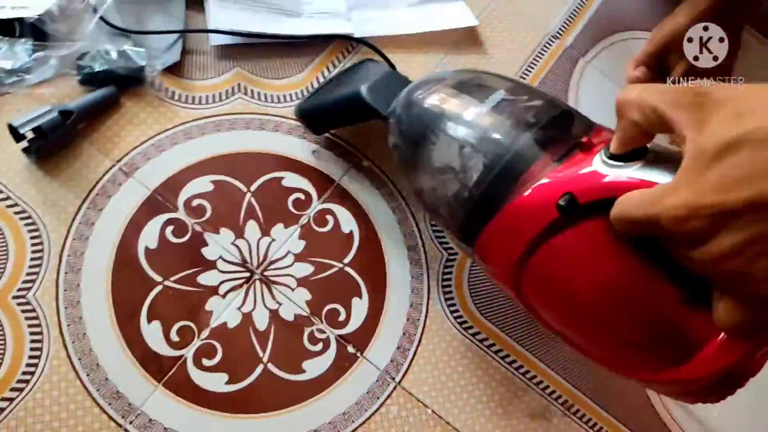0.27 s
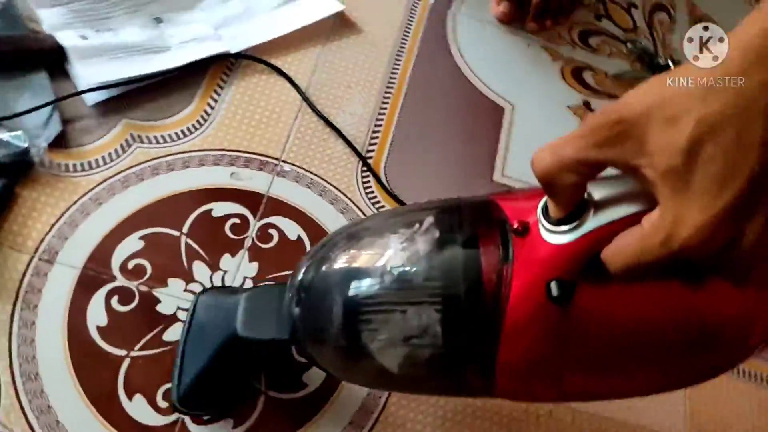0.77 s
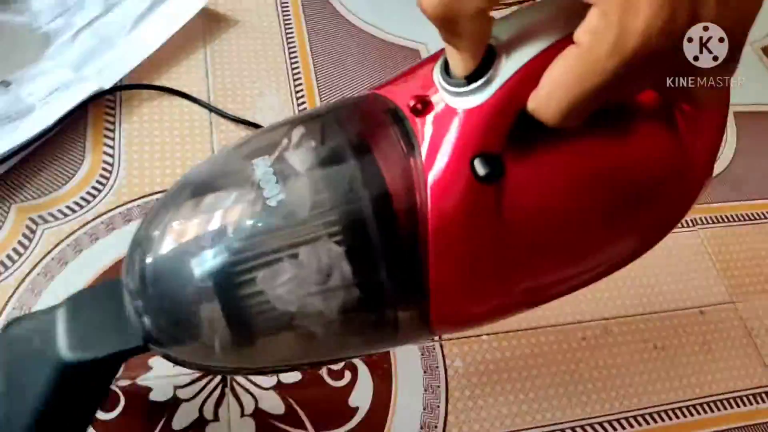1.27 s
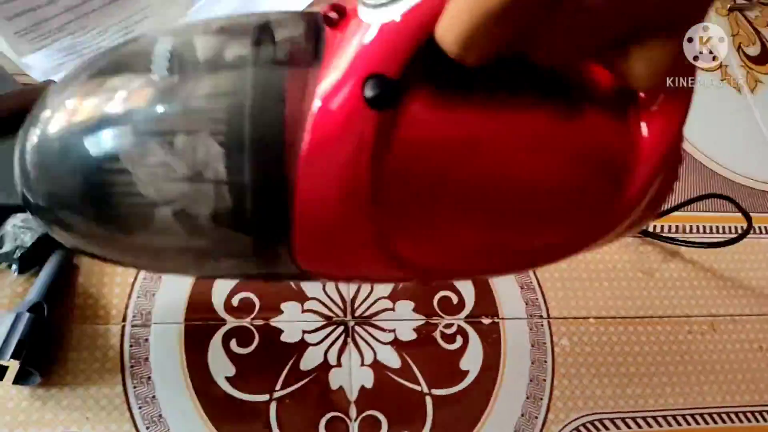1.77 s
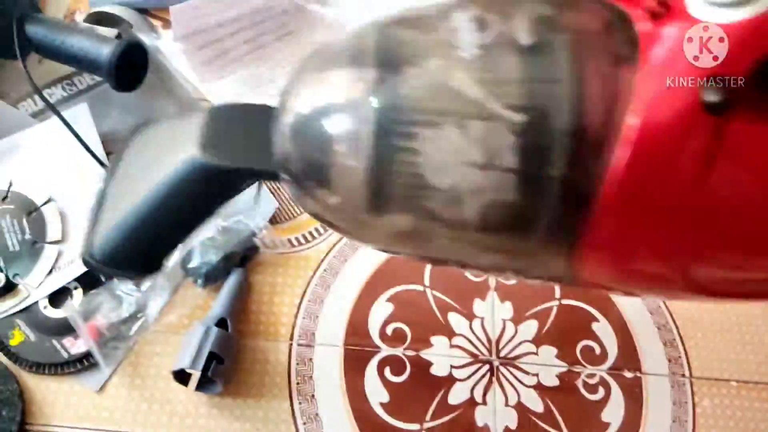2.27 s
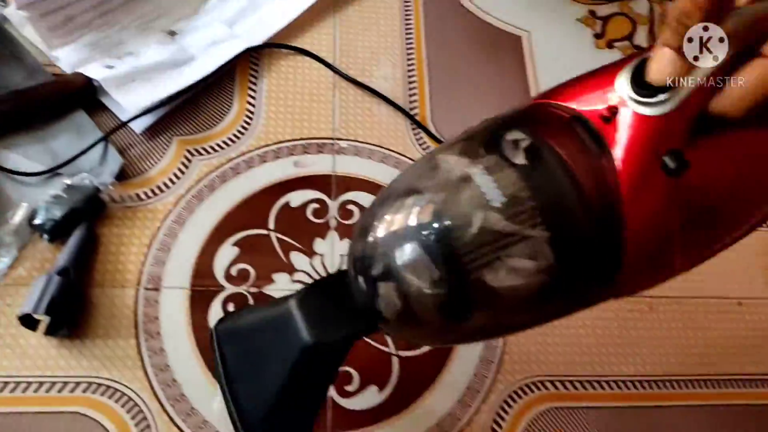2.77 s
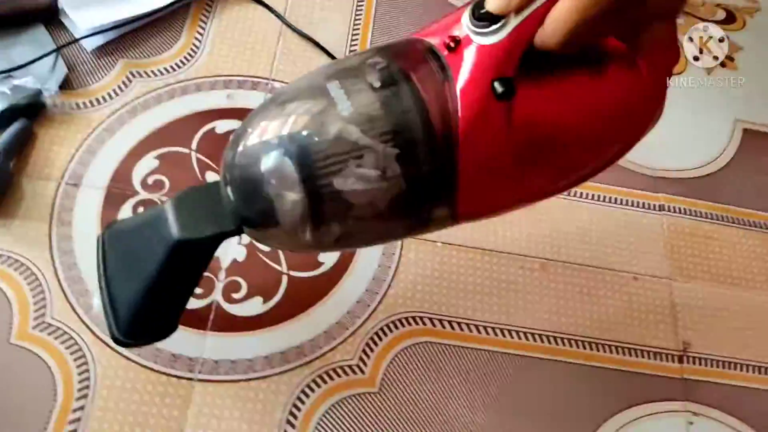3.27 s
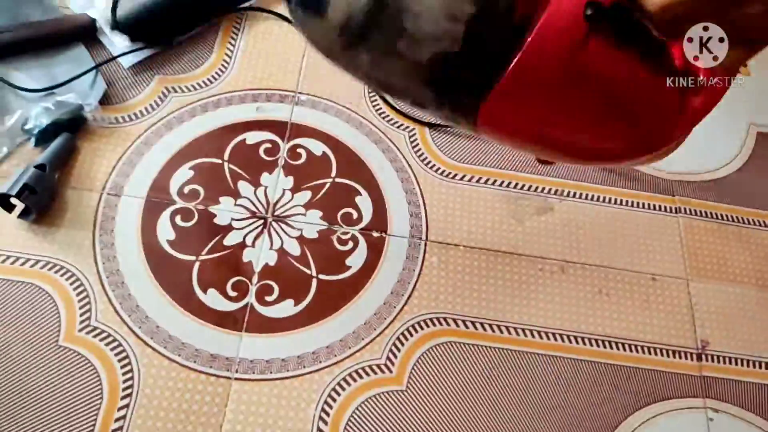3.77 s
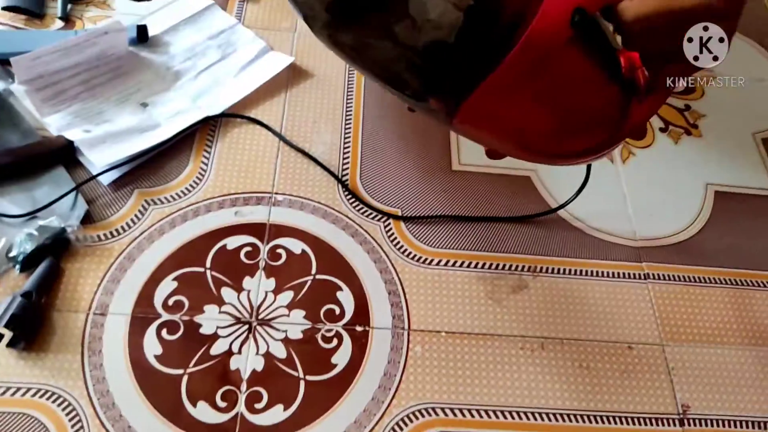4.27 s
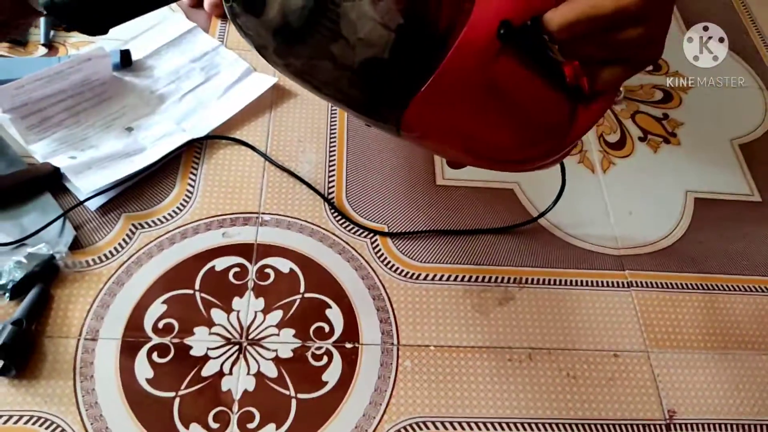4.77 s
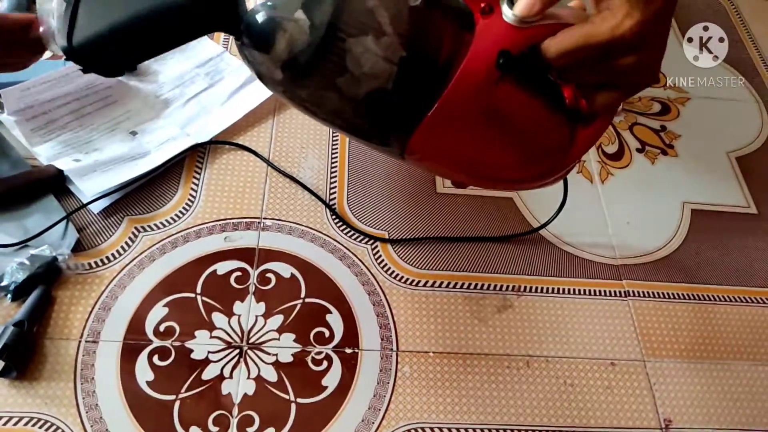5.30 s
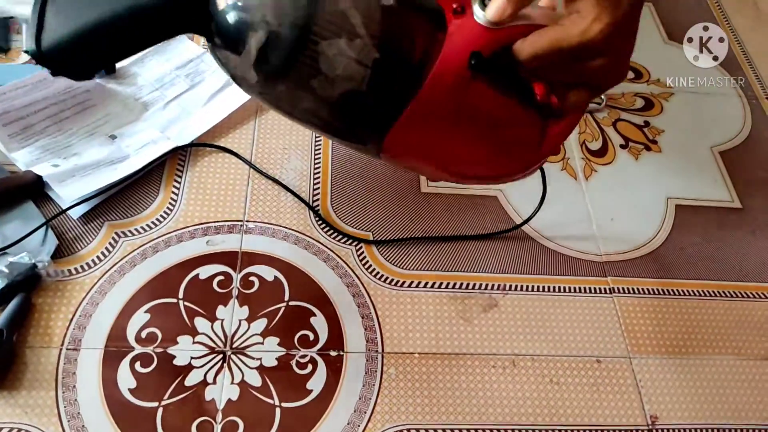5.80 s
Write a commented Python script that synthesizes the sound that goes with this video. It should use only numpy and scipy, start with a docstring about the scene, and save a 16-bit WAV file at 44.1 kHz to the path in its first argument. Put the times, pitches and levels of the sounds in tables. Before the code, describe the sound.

A small vacuum cleaner roars and whines close by, rises in pitch after a slap over its nozzle, then coasts down to a switch click.

```python
"""In a tiled room, a small corded vacuum cleaner is waved about near a two-microphone phone.
Filtered noise makes the rushing air; sines locked to the shaft make the whine.
A palm slaps over the nozzle, so the unloaded fan speeds up; power is cut and the rotor coasts down.
At the end the plastic switch clicks, and its tail of broad noise sinks away in the room.
Knocks and clicks are sums of fading sines and noise; a low rumble of noise lies beneath."""
import sys
import numpy as np
from scipy import signal
from scipy.fft import rfft, irfft, next_fast_len
from scipy.io import wavfile
from scipy.ndimage import uniform_filter1d, map_coordinates

SR = 44100
rng = np.random.default_rng(int(sys.argv[2]) if len(sys.argv) > 2 else 0)


def magnitude_from_level(level_db):
    """Linear magnitude for a level in decibels (20 dB per decade)."""
    exponent = np.asarray(level_db, float) / 20
    return 10 ** exponent


def bounce(signal):
    """Save signal as a 16-bit WAV file at the path given by the first command-line argument."""
    frames = np.transpose(np.atleast_2d(signal))
    limited = np.clip(frames, -1, 1)
    pcm = np.round(limited * 32767).astype(np.int16)
    wavfile.write(sys.argv[1], SR, pcm)


N = 266408  # length of the scene [samples]

SEALED_S, SEALING_S = 2.2, 0.17  # the palm starts to close the nozzle [s], and takes this long [s]

# Rotor under power: settled speed, shortfall at the start [turns/s] and its time constant [s]
RUN_RPS, LAG_RPS, LAG_S = 467, 7.5, 0.28
# Slow creep until the nozzle is sealed [turns/s per s]; then gain [turns/s] and its time constant [s]
CREEP_RPS, UNLOAD_RPS, UNLOAD_S = 0.9, 62.6, 0.537
# Power is cut [s]; a quick first sag [share, s], then drag [per s] towards a slow spin [turns/s]
CUT_S, SAG, SAG_S, DRAG_PER_S, SLOW_RPS = 2.79, 0.018, 0.101, 0.472, 35
FULL_RPS = 500  # speed at which the levels are given [turns/s]

# Colours of the air, each for open nozzle, sealed and fast, sealed and slow:
# (frequency [Hz], relative level [dB per Hz])
ROAR_SPECTRA = ([(15, -70), (25, -58), (43, -38), (113, -16), (134, -6.5), (154, -1.5), (222, -4.5),
                 (315, -0.5), (419, -1.5), (460, 0), (548, -1.5), (1100, -1), (1430, -54), (2420, -120)],
                 [(15, -57), (25, -42), (60, -20), (118, -7.5), (150, 1.5), (222, -3.5), (346, -6.5),
                 (439, 3.5), (566, -6), (673, 2), (740, -1), (1100, -3.5), (1430, -35), (2420, -120)],
                 [(15, -40), (25, -31), (65, -30), (107, -10), (124, -11.5), (175, -3.5), (222, -7),
                 (393, -5.5), (439, 3), (593, -9.5), (652, -2.5), (1100, -17), (1430, -47), (2420, -120)])
CUP_SPECTRA = ([(590, -57), (1000, -42), (1080, -3), (1590, -4.5), (1920, -8), (2040, -3), (2210, -6.5),
                (2560, 2.5), (2720, -1), (3070, -9), (3360, -19), (3440, -7), (3900, -18), (5070, -13),
                (8580, -120)], [(590, -34), (1000, -11), (1390, -5), (1640, -1), (1690, 2.5), (1900, 0),
                (2000, -0.5), (2090, -5.5), (2310, -4.5), (2790, -11.5), (3100, -11.5), (4030, -15),
                (6820, -120)], [(590, -45), (1000, -10), (1180, -12.5), (1280, 0.5), (1480, -1.5),
                (1660, -2), (2040, -10), (2350, -7), (2660, -15), (3750, -25), (3900, -40), (5070, -42),
                (8580, -120)])
HISS_SPECTRA = ([(2180, -32.5), (3700, -8), (4550, -15), (5060, -8), (5870, -7.5), (6310, -7), (6840, -6.5),
                 (7250, 0.5), (8110, 1.5), (9190, -4), (10200, -18.5), (10500, -51), (10800, -22),
                 (14000, -43), (22000, -120)], [(2290, -64), (3900, -25), (4210, -9), (4810, -15.5),
                 (5320, -9), (6290, -9.5), (6870, -5), (7270, 0.5), (8730, -2), (9540, -6.5), (10800, -41),
                 (14000, -61), (22000, -120)], [(2180, -13.5), (3700, -4), (4310, -5), (4470, 2.5),
                 (4670, -6), (4840, -3), (5180, -3), (6200, -2), (8000, 4.5), (8670, 5.5), (10800, -25),
                 (14000, -81), (22000, -120)])
# Colour of the highest hiss: (frequency [Hz], relative level [dB per Hz])
TOP_SPECTRUM = [(6180, -43), (10500, -8.5), (13000, -5), (14000, -4.5), (15300, -11.5)]
# Air layers roar, dust cup, exhaust hiss, top hiss: (open nozzle [dB], change when sealed [dB],
# growth [dB per dB of speed], steepening [per dB], share of nearness [dB per dB])
AIR_LEVELS = [(-24.5, -3, 0.48, 0.2145, 1.4), (-19, 1.4, 0.9946, 0.18, 1.04),
              (-14, -2.5, 2.5, 0.0872, 1.33), (-33.5, -10.5, 3, 0.7, 1.5)]
QUIET_TOP_DB, GUST_DB = -59, 0.43  # steady part of the top hiss [dB], size of the gusts [dB]
# The body is waved about: (time [s], nearness [dB], hum passed on by the casing [dB])
WAVING = [(0, -1.5, -5), (.4, -1.14, 4.5), (.9, -1.04, 4), (1.25, -0.2, 4), (1.5, -0.5, 5),
          (1.8, -0.26, -16), (2.05, -0.85, 0), (2.17, -0.2, 6), (2.24, -3.5, 4), (2.3, -1.5, 11),
          (2.4, 0.2, 2), (2.75, -0.7, 16), (2.96, 0.8, 0.5), (3.3, 0.14, 2.5), (3.7, -0.04, 2),
          (5.1, 2, -1), (6.04, 8.5, 6)]

# Cycles per shaft turn: rotor unbalance, then seven fan blades and their overtones
ORDER_NUMBERS = (1, 7, 14, 21)
# One row per order: (open nozzle [dB], change when sealed [dB], growth [dB per dB of speed])
ORDER_LEVELS = [(-37, 2, .6), (-41.5, 17.5, 1.8), (-37.5, 1, 2.3), (-50, -6, 5)]
# Shell and room favour some pitches of a tone: (frequency [Hz], gain [dB], left over right [dB])
FAVOURED_PITCHES = [(138, -16.5, 11), (178, -9.5, 14.5), (208, 0, 9), (235, 2, 5), (250, 5.5, 4),
                    (258, -12, 13), (297, -0.5, 21), (325, 10.5, -9), (346, 3.5, 17), (360, 1.5, 3),
                    (406, -3, 11), (430, 8.5, 2), (464, -0.5, 8.5), (504, -17, -3), (900, -15, 6),
                    (1250, -6.5, 1), (1400, -4, 7), (1500, 1.5, 2), (1620, -8, -1), (1720, 0, 2),
                    (1880, -17, 6), (2020, -17, 2), (2130, 3, 4), (2390, 6.5, 1), (2500, -1.5, 1),
                    (2750, 8.5, 5.5), (3170, -1.5, 6), (3260, 6, 10.5), (3680, 3, 7.5), (5030, -9, 3),
                    (6560, 15, -12), (7140, 9, 7), (10700, 17, 0)]
# The exhaust turns towards and away from the phone:
# (time [s], blade tone [dB], its left over right [dB], first overtone [dB])
FACING = [(0, 2, -12, -4), (.3, 7, -13, -1), (.6, 7, -13, -3), (.8, 3, -8, -5), (1, 7, -7, -6),
          (1.3, 5, -7, -6), (1.6, 9, -8, -5), (1.85, 8, -10, -8), (2.05, 4, -11, -10), (2.18, 4, -8, -10),
          (2.21, 2, -3, -6), (2.45, -.5, -3, -1), (2.7, 0, 0, 4), (2.85, -.5, 0, 1), (3.05, 0, 0, -9),
          (3.6, 3, 0, -4), (4.3, 2, 0, 1), (4.7, 5, 0, 1), (5.1, 2, 0, 1)]

# Blows on the shell: (time [s], thud [dB], knock [dB], snap [dB], left over right [dB])
BLOWS = [(.073, -36, -8, -28, -1), (2.184, -32, -22, -8, 1), (2.191, -12, -22, -23, -2),
         (2.203, -32, -10, -26, 4), (2.211, -23, -11, -21, -1), (2.218, -25, -31, -29, -2),
         (2.227, -38, -33, -30, -3), (5.018, -50, -27, -50, 0), (5.809, -45, -17, -40, 10)]
# Bounces of the air in the dust cup, hollow shell modes, stiff shell modes:
# (frequency [Hz], relative level [dB], time to fade by 60 dB [s])
CUP_AIR_MODES = [(97, -12.5, 0.095), (151, -7.5, 0.085), (190, -2.5, .07), (302, -23, 0.011),
                 (467, -1.5, .035), (588, -1.5, 0.045)]
HOLLOW_MODES = [(675, -2, 0.032), (801, 0, 0.026), (1030, -3.5, 0.026)]
STIFF_MODES = [(1500, 5, 0.0085), (2320, 0.5, 0.013), (2770, -17, 0.0068), (7540, -8, 0.009)]

# Chatter of the switch contact: (start [s], held [s], peak before echo, treble loss and ports [dB])
CLICK = (5.806, 0.0031, -15.5)
# Ringing of its spring and cap: (frequency [Hz], relative level [dB], time to fade by 60 dB [s])
SWITCH_MODES = [(2980, -9, .008), (3840, 2, 0.005), (5300, -14, .006), (6400, -9.5, 0.0066),
                (7670, 5, 0.0065), (8900, -8, 0.0067)]
# Noise tail of the click in the room: (start [s], starting level [dB], held [s], loss [dB/s],
# extra loss after the hold [dB/s])
CLICK_TAIL = (5.812, -32.5, .17, 30, 150)
# Colour of that tail: (frequency [Hz], relative level [dB per Hz])
CLICK_TAIL_SPECTRUM = [(180, -23), (400, -8), (650, -10), (1000, -5), (1500, -17), (3000, -18), (4920, -15),
                       (7720, -9), (9300, -12), (11000, -34), (14000, -36)]

# How long the tiled room rings: (frequency [Hz], time to fade by 60 dB [s])
ROOM_FADE = [(150, 1), (800, 1), (3000, 1), (8000, 0.49), (15000, 0.053)]
# How alike left and right are: (frequency [Hz], correlation [-1 to 1])
ALIKE = [(60, 0.85), (150, 1), (380, 0.8), (940, 0.22), (2370, -0.025), (5930, -0.026), (14900, -0.0063)]
# The two microphone ports resonate apart: (frequency [Hz], left over right [dB])
PORTS = [(100, -0.5), (300, 3.5), (600, 3.5), (1500, 1.5), (4000, 1), (6000, 2), (7500, -6.5), (8300, 2),
         (9300, 12.5), (10500, 5), (15000, 0.5)]
# The room's low floor: (frequency [Hz], relative level [dB per Hz])
RUMBLE_SPECTRUM = [(15, -30), (30, -31), (60, -11), (105, -0.5), (160, -7), (260, -4), (340, -6), (480, -6),
                   (700, -1), (1100, -34), (2000, -66)]
RUMBLE_DB = -45.5  # level of the floor [dB]


def unit(x):
    """Scale a signal to rms 1."""
    return x / np.sqrt(np.mean(x ** 2) + 1e-20)


def along(points, hz):
    """Read a curve of (frequency [Hz], value) points on a log frequency axis."""
    f, v = np.transpose(points)
    return np.interp(np.log(hz + 1), np.log(f + 1), v)


def curves(rows):
    """Give one value per sample for each column after the time."""
    s, *columns = np.transpose(rows)
    return np.array([np.interp(np.arange(N) / SR, s, column) for column in columns])


def since(s):
    """Seconds after time s, zero before."""
    return np.clip(np.arange(N) / SR - s, 0, None)


def wobble(rate):
    """A smooth random curve with rate knots a second."""
    knots = rng.standard_normal(int(N * rate / SR) + 4)
    return map_coordinates(knots, [np.arange(N) * rate / SR])


def filtered(x, response):
    """Multiply the spectrum of x by a response that depends on frequency."""
    m = next_fast_len(N + SR // 2)
    hz = np.fft.rfftfreq(m, 1 / SR)
    return irfft(rfft(x, m) * response(hz), m)[..., :N]


def paired(pair, gain):
    """Mix two unrelated signals so that the ports hear the bass alike and the treble apart."""
    turn = lambda hz: np.arccos(np.clip(along(ALIKE, hz), -1, 1)) / 2
    mid, side = filtered(pair, lambda hz: gain(hz) * [np.cos(turn(hz)), np.sin(turn(hz))])
    return np.array([mid + side, mid - side])


def rush(spectrum, patchy_db):
    """Stereo noise of rms 1, coloured, with patches of random gain in time and pitch."""
    z = signal.stft(rng.standard_normal((2, N)), nperseg=512)[2]
    patches = uniform_filter1d(rng.standard_normal(z.shape[1:]), size=5, axis=0)
    patches = uniform_filter1d(patches, size=12, axis=1)
    pair = signal.istft(z * magnitude_from_level(patchy_db * unit(patches)), nperseg=512)[1][:, :N]
    return unit(paired(pair, lambda hz: magnitude_from_level(along(spectrum, hz))))


def ringing(modes, t, spread_db=0):
    """Sum fading sines, one per mode, with a random level spread."""
    total = np.zeros(len(t))
    for hz, db, t60 in modes:
        fade = magnitude_from_level(db + rng.normal(0, spread_db) - 60 * t / t60)
        total += fade * np.sin(2 * np.pi * hz * t)
    return total


def room(x):
    """Echo of the tiled room: a noise tail in which each frequency dies at its own speed."""
    hz, t, z = signal.stft(rng.standard_normal((2, SR)), SR, nperseg=256)
    fade = magnitude_from_level(-60 * t / along(ROOM_FADE, hz)[:, None])
    tail = signal.istft(z * fade, SR, nperseg=256)[1]
    tail = np.pad(tail, ((0, 0), (round(0.006 * SR), 0)))  # the echo starts 6 ms late
    tail = tail / np.linalg.norm(tail[0])
    wet = signal.fftconvolve(x.mean(0)[None], tail, axes=1)[:, :N]
    return paired(wet, np.ones_like)


def shaft():
    """Turns per second: settling, rising once the fan has no air to move, coasting after the cut."""
    powered = since(0) - since(CUT_S)  # seconds under power
    unloaded = np.clip(powered - SEALED_S, 0, None)
    run = RUN_RPS - LAG_RPS * np.exp(-powered / LAG_S)
    run = run + CREEP_RPS * np.minimum(powered, SEALED_S)
    run = run + UNLOAD_RPS * (1 - np.exp(-unloaded / UNLOAD_S))
    sag = SAG * (1 - np.exp(-since(CUT_S) / SAG_S))
    coast = np.exp(-DRAG_PER_S * since(CUT_S) - sag)
    return SLOW_RPS + (run - SLOW_RPS) * coast


def loudness_db(open_db, sealed_db, growth, steepening=0, sealing_s=SEALING_S):
    """Level that shifts as the nozzle is sealed and follows speed; steepening bends its fall."""
    speed_db = 20 * np.log10(shaft() / FULL_RPS)
    sealed = np.clip(since(SEALED_S) / sealing_s, 0, 1)
    return open_db + sealed_db * sealed + growth * speed_db - steepening * speed_db ** 2


def airflow():
    """Turbulent air: noise bands that change colour as the nozzle is sealed and the fan slows."""
    sealed = np.clip(since(SEALED_S) / SEALING_S, 0, 1)
    fast = np.clip((shaft() - 200) / 290, 0, 1) ** 2.36
    shares = np.sqrt([1 - sealed, sealed * fast, sealed * (1 - fast)])  # crossfade in power
    near_db, gust_db = curves(WAVING)[0], GUST_DB * wobble(6.52)

    def blend(spectra, patchy_db):
        """Crossfade the noises of the three nozzle states."""
        return sum(share * rush(spectrum, patchy_db) for share, spectrum in zip(shares, spectra))

    gains = []
    for *level, near_share in AIR_LEVELS:
        gains.append(magnitude_from_level(loudness_db(*level) + near_share * near_db + gust_db))
    roar, cup, hiss, top = gains
    body = roar * blend(ROAR_SPECTRA, patchy_db=1.6)
    body = body + cup * blend(CUP_SPECTRA, patchy_db=1.5)
    body = body + hiss * blend(HISS_SPECTRA, patchy_db=1.5)
    top = np.hypot(top, magnitude_from_level(QUIET_TOP_DB))
    return body + top * rush(TOP_SPECTRUM, patchy_db=5.5)


def whine():
    """Sines locked to the shaft, roughened by uneven flow; waving makes the path to each port drift."""
    speed = shaft()
    turns, hum_db = np.cumsum(speed) / SR, curves(WAVING)[1]
    hz, gain_db, pan_db = np.transpose(FAVOURED_PITCHES)
    blade_db, swing_db, overtone_db = curves(FACING)
    drift_size_db = np.where(since(SEALED_S) > 0, 0.7, 1.5)
    unsteady = np.where(since(CUT_S) > 0, 0.019, 0.011)  # the coasting rotor runs less evenly [turns]
    dry = np.zeros((2, N))
    for order, level in zip(ORDER_NUMBERS, ORDER_LEVELS):
        db = loudness_db(*level, sealing_s=0.011) + along(np.c_[hz, gain_db], order * speed)
        db = db + hum_db * (order == 1) + blade_db * (order == 7) + overtone_db * (order == 14)
        left_over_right_db = along(np.c_[hz, pan_db], order * speed) + swing_db * (order == 7)
        db = db + left_over_right_db * [[0.5], [-0.5]]
        drift_db = drift_size_db * (order > 1) * np.array([wobble(2.5), wobble(2.8)])
        rough_db = 2.3 * np.array([wobble(40), wobble(38)])
        path = 0.035 * np.array([wobble(3), wobble(3.3)])  # slow drift [turns]
        cycles = order * (turns + path + unsteady * wobble(70))
        dry += magnitude_from_level(db + drift_db + rough_db) * np.sin(2 * np.pi * cycles)
    return dry + magnitude_from_level(-9) * room(dry)


def blows():
    """Palm and switch push the shell: a low thud, a hollow knock and a stiff, scratchy snap."""
    dry, t = np.zeros((2, N + SR)), np.arange(SR // 5) / SR
    for s, thud_db, knock_db, snap_db, pan_db in BLOWS:
        # each part swells in over one or two milliseconds
        thud = ringing(CUP_AIR_MODES, t, spread_db=0.4) * (1 - np.exp(-t / 0.0014))
        knock = ringing(HOLLOW_MODES, t, spread_db=0.4) * (1 - np.exp(-t / 0.0018))
        scratch = np.diff(rng.standard_normal(len(t) + 1)) * magnitude_from_level(-60 * t / 0.015)
        snap = ringing(STIFF_MODES, t, spread_db=0.4) + 1.9 * scratch
        snap = snap * (1 - np.exp(-t / 0.0013))
        blow = magnitude_from_level(thud_db) * thud + magnitude_from_level(knock_db) * knock + magnitude_from_level(snap_db) * snap
        start = round(s * SR)
        dry[:, start:start + len(t)] += blow * magnitude_from_level([[pan_db / 2], [-pan_db / 2]])
    dry = dry[:, :N]
    return dry + room(dry)


def switch():
    """A few milliseconds of contact chatter set the spring and cap of the switch ringing."""
    s, held_s, peak_db = CLICK
    t = np.arange(SR // 20) / SR
    rise = np.clip(t / 0.00055, 0, 1)
    fall = np.clip((held_s - t) / 0.0005, 0, 1)
    chatter = rng.standard_normal(len(t)) * rise * fall
    click = np.convolve(chatter, ringing(SWITCH_MODES, t))[:len(t)]
    dry, start = np.zeros((2, N)), round(s * SR)
    dry[:, start:start + len(t)] = magnitude_from_level(peak_db) * click / np.abs(click).max()
    return dry + magnitude_from_level(0.5) * room(dry)


def click_tail():
    """Noise tail of the click: broad, patchy noise in the room that sinks, then dies faster."""
    s, db, held_s, slow_db, fast_db = CLICK_TAIL
    level_db = db - slow_db * since(s) - fast_db * since(s + held_s) + 2.0 * wobble(40)
    rise = np.clip(since(s) / 0.0065, 0, 1)
    return magnitude_from_level(level_db) * rise * rush(CLICK_TAIL_SPECTRUM, patchy_db=5.5)


def rumble():
    """The room's low floor: steady noise, strongest below about 700 Hz."""
    return magnitude_from_level(RUMBLE_DB) * rush(RUMBLE_SPECTRUM, patchy_db=3.0)


def scene():
    """Mix all sources; the ports colour the air, the blows and the switch."""
    ports = lambda hz: magnitude_from_level(along(PORTS, hz) * [[0.5], [-0.5]])
    # the microphones fall off above their resonance
    treble = lambda hz: 1 / np.sqrt(1 + (hz / 9700) ** 16)
    knocks = filtered(blows() + switch(), treble)
    return filtered(airflow() + knocks, ports) + whine() + click_tail() + rumble()


def roll_off(x):
    """The treble ends steeply here."""
    return signal.sosfilt(signal.butter(12, 15460, fs=SR, output="sos"), x)


def record(dry):
    """Peaks stop at full scale."""
    mix = np.clip(dry, -1, 1)
    return roll_off(mix)


dry = scene()
out = record(dry)
bounce(out)
```